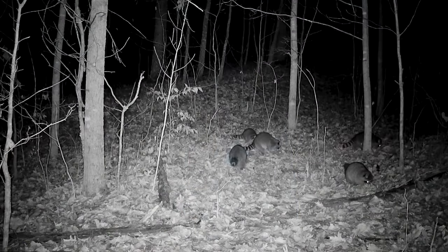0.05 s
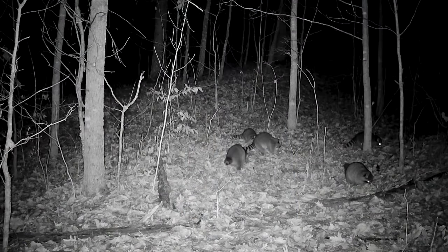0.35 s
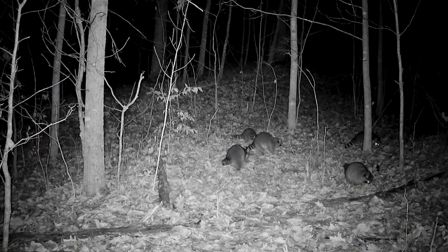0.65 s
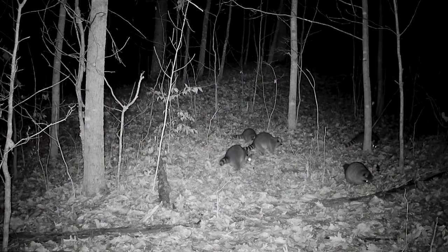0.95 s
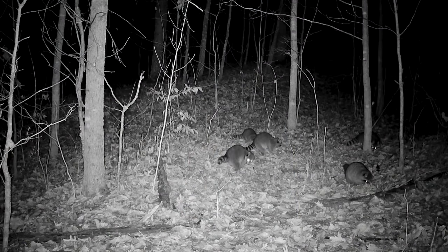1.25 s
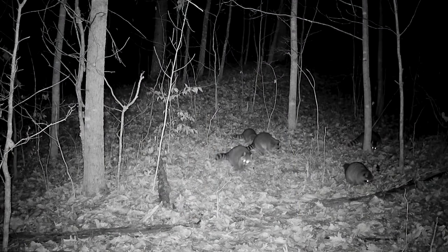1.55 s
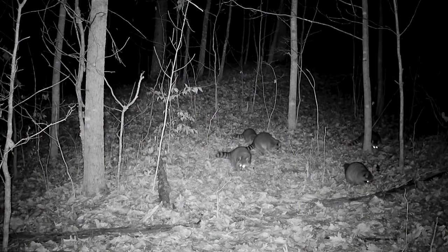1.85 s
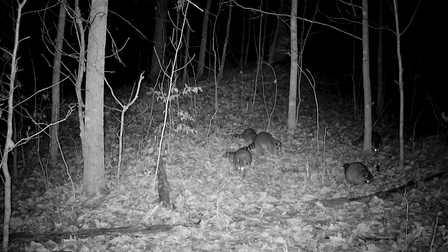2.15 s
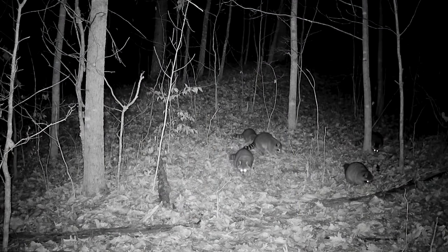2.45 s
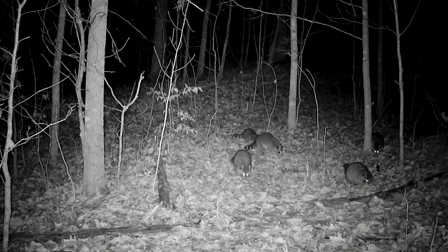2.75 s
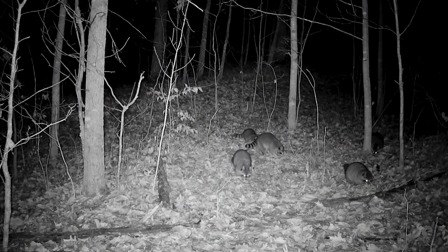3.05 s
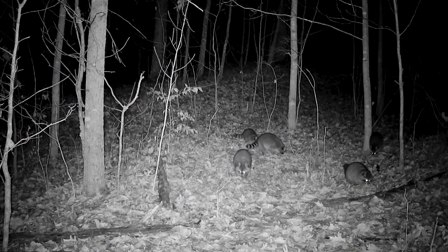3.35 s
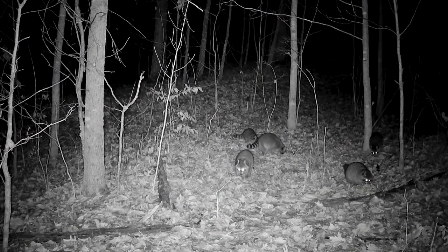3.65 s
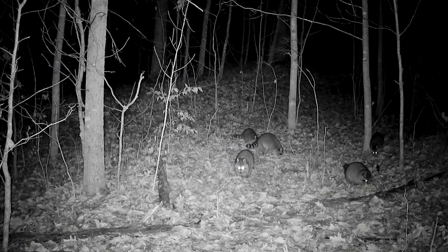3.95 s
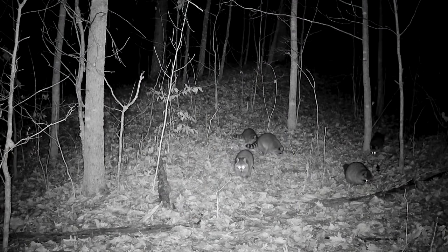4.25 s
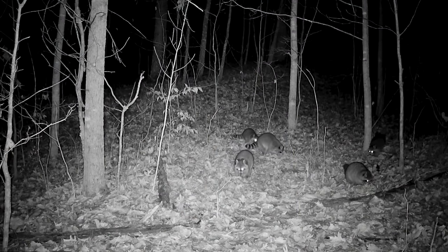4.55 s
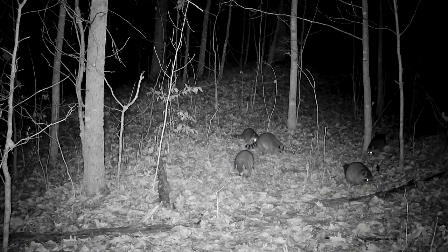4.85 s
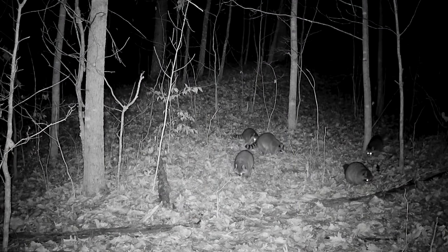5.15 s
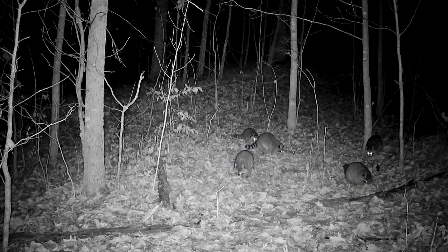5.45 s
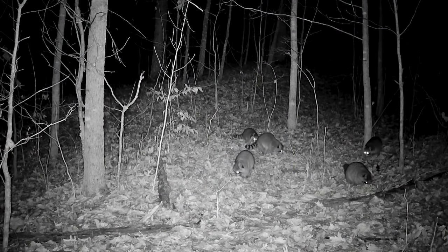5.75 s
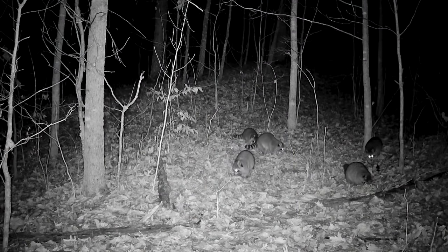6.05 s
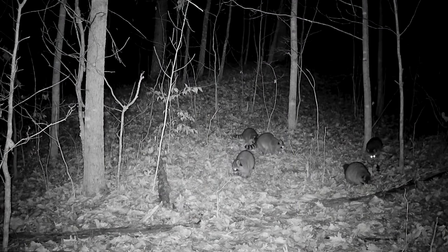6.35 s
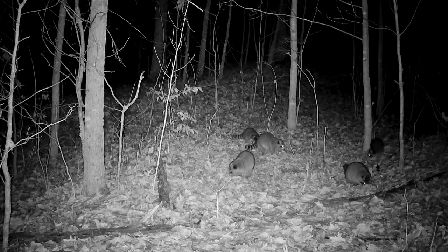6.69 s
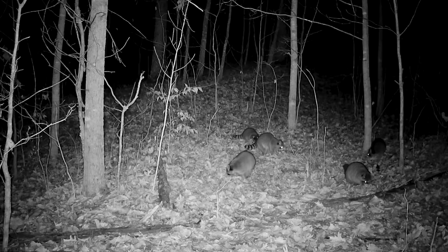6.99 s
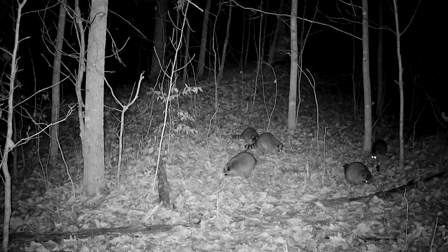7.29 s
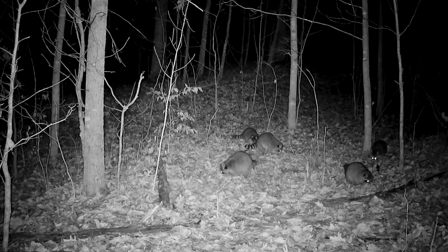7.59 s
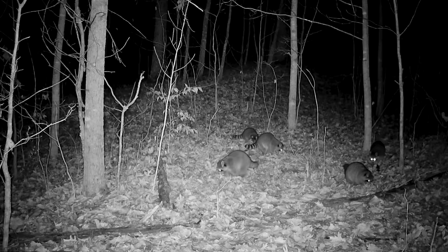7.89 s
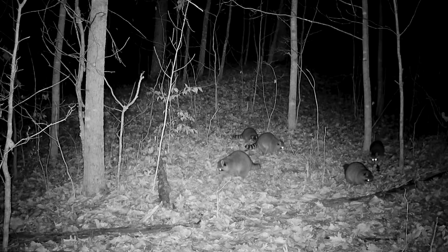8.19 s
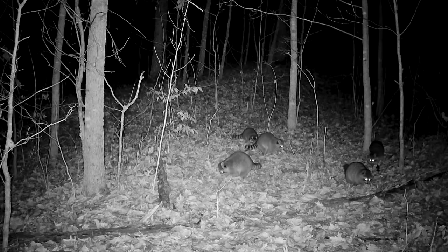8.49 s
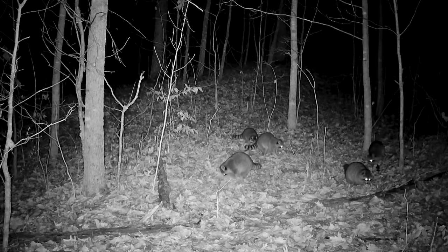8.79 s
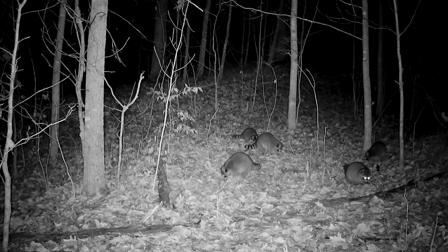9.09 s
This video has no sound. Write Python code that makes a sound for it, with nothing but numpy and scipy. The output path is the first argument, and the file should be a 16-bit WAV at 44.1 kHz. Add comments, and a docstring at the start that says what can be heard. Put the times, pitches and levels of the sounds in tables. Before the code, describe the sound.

A field cricket chirps close by over trilling tree crickets, ticking katydids and a distant frog in a wood at night.

```python
"""A wood at night, two spaced microphones. Throughout: far machine hum, a chorus of trilling and throbbing
tree crickets, katydids shuffling on the left, a field cricket chirping close by. All these insects
draw a scraper over a wing file. Farther field crickets answer: right from 0.2 s, left from 2.2 s.
From 0.8 to 4.3 s a far frog pulses its throat in four double croaks. From 2.8 s a katydid ticks on the
right. On the left another scrapes at 5.2 and 8.2 s and zips four times between 7.5 and 9 s."""
import sys
import numpy as np
from scipy import signal
from scipy.fft import rfft, irfft, next_fast_len
from scipy.io import wavfile

SR = 44100
rng = np.random.default_rng(int(sys.argv[2]) if len(sys.argv) > 2 else 0)


def store_wav(level_fs):
    """Save 16-bit WAV to argv[1]."""
    pcm = np.round(np.clip(np.atleast_2d(level_fs), -1, 1) * 32767)
    wavfile.write(sys.argv[1], SR, pcm.T.astype(np.int16))


N = 406954
TIME = np.arange(N) / SR

# Rumble and hiss before the swell. Each row: frequency in Hz, left and right density in dB per Hz.
AIR_SPECTRUM = [(25, -94, -115), (42, -78, -99), (62.8, -79, -64), (90.5, -65, -63), (103, -67, -62),
                (138.5, -71, -64), (145.7, -73, -73.5), (238, -80.5, -78.5), (329, -83, -84),
                (430, -85.5, -90.5), (1030, -93, -98), (1670, -97, -99), (2820, -99, -100.5),
                (4550, -104, -105), (6000, -102, -103), (8750, -102, -103), (14700, -100, -100.5)]
# Swell of rumble and hum. Each row: time in seconds, gain in dB.
RUMBLE_SWELL = [(0.0, -1.7), (0.25, 2.3), (0.6, -2.1), (2.3, -1.5), (4.6, 0.1), (5.05, 1.7), (5.85, -0.3),
                (7.1, 2.0), (8.1, -0.7), (8.75, -0.9), (9.2, 2.5)]
# Far machine. Each row: frequency in Hz, level before the swell in dB, left minus right in dB.
HUM_TONES = [(88.3, -54, 13.5), (122.3, -53.5, -10), (138.5, -61.5, -3.5), (151.1, -68.5, -10)]
# Farthest crickets. Each row: centre in Hz, resonance width in Hz, mean level in dB.
CHORUS_BANDS = [(2270, 480, -66), (3253, 400, -68), (4117, 400, -62.8)]
# Frog notes. Each row: start in seconds, relative level in dB.
FROG_NOTES = [(.795, -5.5), (0.891, 0), (1.74, -5.5), (1.846, 0), (3.069, -2), (3.171, 0.5), (4.110, -4),
              (4.214, 1.5)]
# Wing resonances, left katydids. Each row: centre in Hz, width in Hz, gain in dB.
WING_MODES = [(9390, 210, 1.5), (9850, 140, 1), (10500, 230, -1.5), (10960, 62, 6), (11200, 81, -2),
              (12030, 330, -1.5), (14240, 530, 2), (14300, 280, -7), (16200, 1400, -1)]
# Colour of the shuffle and of the ticks. Each row: frequency in Hz, gain in dB.
SHUFFLE_SPECTRUM = [(4000, -43), (7000, -19), (9400, -16), (10300, -6.5), (11300, -2), (12500, 2),
                    (13300, 5), (14600, -5.5), (15500, 3.5), (16500, 3)]
TICK_SPECTRUM = [(2000, -36), (6000, -20.5), (8300, -13), (9600, -8), (11000, -3.5), (13200, 5), (15300, 3),
                 (16500, -9)]
# Phrases, right katydid. Each row: time of the last opening tick in seconds, relative level in dB.
TICK_PHRASES = [(2.863, -2.5), (3.129, -.5), (3.393, 0), (3.641, 0.5), (3.890, -0.5), (4.149, -1),
                (4.480, -14), (4.730, -14), (4.983, -13), (5.395, 0), (7.309, -12), (7.704, -13)]
# Ticks that open a phrase. Each row: offset from the last one in seconds, relative level in dB.
OPENING_TICKS = [(-.086, -4.5), (-.019, -2.5), (0, 0)]
# Zips and lower scrapes, left katydid.
# Each row: start in seconds, length in seconds, relative level in dB, centre in Hz, width in Hz.
ZIP_SWEEPS = [(7.491, .027, -47, 8900, 1500), (7.788, .033, -37.5, 11100, 5000),
              (8.612, .022, -46, 9100, 1600), (8.879, 0.063, -30, 11500, 3180)]
SCRAPE_SWEEPS = [(5.203, .046, -57, 5150, 400), (8.16, .048, -57, 5300, 500)]
# Field cricket bouts. Each row: first chirp in seconds, last chirp in seconds, relative level in dB.
FAR_LEFT_BOUTS = [(2.2, 3.44, 0), (4.571, 4.571, -1), (5.212, 9.11, 0)]
FAR_RIGHT_BOUTS = [(.2, 3.42, -0.15), (.582, .582, -0.9), (4.111, 7.913, 0), (8.53, 8.3, 1)]
NEAR_BOUTS = [(-.058, .335, 1), (.918, .918, 2), (1.362, 2.412, 0.5), (2.789, 3.147, .5),
              (3.562, 6.208, .5), (6.603, 6.603, .3), (6.947, 8.781, -.6), (9.171, 9.171, 1)]
# Near chirp: a soft lead-in, four full strokes. Each row: offset from the first full stroke in seconds,
# length in seconds, top pitch in Hz, relative level in dB.
CHIRP_STROKES = [(-.032, .026, 4070, -10), (0, .024, 4255, -1.2), (.043, .031, 4305, 0),
                 (.089, .032, 4315, -.2), (.138, .031, 4320, 0)]


def undb(db):
    """Decibels to gain."""
    return 10 ** (np.asarray(db) / 20)


def unit(x):
    """Scale to rms 1."""
    return x / np.sqrt(np.mean(x ** 2) + 1e-20)


def place(x, pan_db):
    """Pan; pan_db is left minus right."""
    return x * undb(np.array([[pan_db], [-pan_db]]) / 2)


def add(out, start_s, x):
    """Mix x into out from start_s."""
    i = int(round(start_s * SR))
    a, b = max(i, 0), min(i + x.shape[-1], N)
    if b > a:
        out[..., a:b] += x[..., a - i:b - i]


def walk(rate_hz):
    """Random wander, spread near 1."""
    knots = rng.standard_normal(2048)
    return 1.2 * np.interp(TIME * rate_hz, np.arange(len(knots)), knots)


def colour(x, hz, db):
    """Filter by a spectrum of (Hz, dB) points."""
    size = next_fast_len(N + 4096)
    bin_hz = np.maximum(np.arange(size // 2 + 1) * SR / size, 1)
    gain = undb(np.interp(np.log(bin_hz), np.log(hz), db))
    return irfft(rfft(x, size) * gain, size)[..., :N]


def ring(x, hz, width_hz):
    """One resonance, gain 1 at its centre."""
    return signal.lfilter(*signal.iirpeak(min(hz, .45 * SR), hz / width_hz, fs=SR), x)


def woods(x, wet_db, t60_s, order=3):
    """Direct sound plus echoes per microphone: sparse off trunks (order 3), dense off leaves (1)."""
    t = TIME[:SR // 2]
    echoes = rng.standard_normal((2, len(t))) ** order * undb(-60 * t / t60_s) * (t > .003)
    echoes *= undb(wet_db) / np.sqrt(np.sum(echoes ** 2, axis=1, keepdims=True))
    x = np.atleast_2d(x)
    return x + signal.fftconvolve(x, echoes, axes=-1)[:, :N]


def air():
    """A far machine's wavering hum in low rumble, under faint even hiss."""
    hz, left_db, right_db = np.transpose(AIR_SPECTRUM)
    noise = np.array([colour(rng.standard_normal(N), hz, db) for db in (left_db, right_db)])
    noise *= np.sqrt(SR / 2)
    rumble = signal.sosfiltfilt(signal.butter(2, 200, fs=SR, output="sos"), noise)
    hiss = noise - rumble
    hum = 0
    for tone_hz, db, pan_db in HUM_TONES:
        sides = []
        for _ in range(2):
            phase = 2 * np.pi * np.cumsum(tone_hz + 1.113 * walk(5)) / SR
            sides.append(np.sin(phase) * undb(db + 2 * walk(3.6)))
        hum += place(np.array(sides), pan_db)
    swell_db = np.interp(TIME, *np.transpose(RUMBLE_SWELL)) - .7
    return hiss + (rumble + hum) * undb(swell_db)


def far_chorus():
    """The farthest crickets merge into a soft band at each kind's pitch."""
    out = 0
    for hz, width_hz, db in CHORUS_BANDS:
        noise = rng.standard_normal((2, N))
        band = ring(ring(noise, hz, width_hz), hz, width_hz)
        out += unit(band) * undb(db + walk(9.1))
    return out


def trill(hz, rate_hz, wander=.00289, sag=.086):
    """One tree cricket: an unbroken train of pure strokes, each sagging in pitch."""
    cycle = (np.cumsum(rate_hz * (1 + .001 * walk(2))) / SR + rng.random()) % 1
    pitch_hz = hz * (1 + wander * walk(25) - sag * (cycle - .5))
    return unit(np.sin(np.pi * cycle) ** 4 * np.sin(2 * np.pi * np.cumsum(pitch_hz) / SR))


def chorus(hz, spread_hz, rate_hz, count=4):
    """Distant trills on neighbouring pitches, blurred by the trees."""
    voices = 0
    for k in np.linspace(-1, 1, count):
        voice = trill(hz + spread_hz * k, rate_hz * rng.uniform(.85, 1.15), wander=.011, sag=.045)
        voices += voice * (1 - .15 * k * k)
    return unit(woods(voices, wet_db=13, t60_s=.35, order=1))


def tree_crickets():
    """By rising pitch: groups that swell in step, drone, throb and hold steady; a soloist, right."""
    crest_s, period_s, half_width_s = .603, .678, .21
    from_crest_s = (TIME - crest_s + period_s / 2) % period_s - period_s / 2
    swell = np.exp(-(from_crest_s / half_width_s) ** 4)
    throb_crest_s, throb_period_s = .59, .66
    throb_db = 2.4 * np.cos(2 * np.pi * (TIME - throb_crest_s) / throb_period_s) + 1.6 * walk(5)
    rising_db = -60.6 + .33 * TIME
    swelling = chorus(2140, spread_hz=45, rate_hz=41) * swell * undb(rising_db)
    droning = chorus(2265, spread_hz=45, rate_hz=46) * undb(rising_db)
    throbbing = chorus(2380, spread_hz=50, rate_hz=44) * undb(-62.3 + throb_db)
    steady = chorus(3160, spread_hz=140, rate_hz=50, count=5) * undb(-65)
    soloist = woods(place(trill(3290, rate_hz=42.8), -14), wet_db=-16, t60_s=.3) * undb(-70)
    groups = place(swelling, 2.3) + place(droning, .46) + place(throbbing, .2) + place(steady, 1.3)
    return groups + soloist


def frog(pulse_period_s=.0132):
    """Each note: four throat pulses in two resonances, the middle pulses strongest."""
    out, t = np.zeros(N), TIME[:SR // 40]
    resonances = np.sin(2 * np.pi * 1530 * t) + .65 * np.sin(2 * np.pi * 3130 * t)
    pulse = t / .0017 * np.exp(-t / .0014) * resonances
    for start_s, db in FROG_NOTES:
        for k, pulse_db in enumerate([-.5, 4.5, 5, 1.5]):
            jitter_s = .0004 * rng.standard_normal()
            add(out, start_s + k * pulse_period_s + jitter_s, undb(db + pulse_db) * pulse)
    croaks = woods(out, wet_db=-7, t60_s=.12, order=1)
    return place(croaks * undb(-41.2), -6)


def wing_ring(strikes):
    """Tooth strikes ring a katydid's wing modes."""
    return sum(undb(db) * ring(strikes, hz, width_hz) for hz, width_hz, db in WING_MODES)


def tooth_strikes(rate_hz):
    """One impulse per file tooth passed."""
    return np.diff(np.floor(np.cumsum(rate_hz) / SR), prepend=0)


def shuffle(wing_hz, tooth_hz):
    """Wings open and close; both sweeps drag the scraper over single teeth."""
    cycle = (np.cumsum(wing_hz * (1 + .003 * walk(2.7))) / SR + rng.random()) % 1
    opening, closing = (np.exp(-((cycle - centre) / .16) ** 4) for centre in (.25, .66))
    teeth = tooth_strikes(tooth_hz * np.exp(.2 * walk(200)))
    return unit(teeth * (opening + undb(-1.5) * closing) * undb(3.2 * rng.standard_normal(N)))


def shuffling_katydids():
    """Two steady singers, left, at slightly different wing rates."""
    strikes = shuffle(wing_hz=16.6, tooth_hz=530) + undb(-3) * shuffle(wing_hz=18.1, tooth_hz=600)
    wings = colour(.89 * strikes + wing_ring(strikes), *np.transpose(SHUFFLE_SPECTRUM))
    song = woods(wings, wet_db=-7.5, t60_s=.08, order=1)
    return place(unit(song) * undb(-60.5), 33.2)


def file_sweep(length_s, db, hz, width_hz):
    """One sweep of the file: tooth strikes swell and fade, each ringing the wing with a dull thud."""
    u = np.linspace(0, 1, int(length_s * SR))
    wander = np.interp(u, np.linspace(0, 1, 20), rng.standard_normal(20))
    teeth = tooth_strikes(420 * np.exp(.31 * wander)) * np.sin(np.pi * u) ** 2
    teeth = np.pad(teeth, (0, SR // 100))
    wing = ring(.5 * teeth + wing_ring(teeth), hz, width_hz)
    thud = ring(teeth, 1600, 2700)
    return undb(db) * (unit(wing) + undb(-22.5) * unit(thud))


def zipping_katydid(lead_s=.06):
    """Left: wings open faintly, then close with a zip; twice they only scrape."""
    out = np.zeros(N)
    for start_s, *sweep in ZIP_SWEEPS:
        add(out, start_s - lead_s, file_sweep(length_s=.04, db=-61, hz=8600, width_hz=2500))
        add(out, start_s, file_sweep(*sweep))
    for start_s, *sweep in SCRAPE_SWEEPS:
        add(out, start_s, file_sweep(*sweep))
    song = woods(out, wet_db=-16, t60_s=.08, order=1)
    return place(song * undb(-13.5), 23)


def ticking_katydid(run_delay_s=.009, run_s=.114, ticks_per_s=180):
    """Close right: each phrase is three separate ticks, then an uneven, quickening run."""
    clicks, impulse = np.zeros(N), np.ones(1)
    for phrase_s, db in TICK_PHRASES:
        for offset_s, tick_db in OPENING_TICKS:
            add(clicks, phrase_s + offset_s, undb(db + tick_db) * impulse)
        for u in np.linspace(0, 1, int(run_s * ticks_per_s)):
            offset_s = run_delay_s + run_s * (u + .15 * u * (1 - u)) + .001 * rng.standard_normal()
            tick_db = -9.8 + 2.2 * rng.standard_normal() - 3.2 * (u - .6) ** 2
            add(clicks, phrase_s + offset_s, undb(db + tick_db) * impulse)
    ticks = colour(clicks, *np.transpose(TICK_SPECTRUM))
    song = woods(ticks, wet_db=-8.5, t60_s=.07, order=1)
    return place(song * undb(-19), -21)


def chirps(bouts, period_s):
    """Time and level of each chirp; bouts are filled evenly at about period_s."""
    return [(chirp_s, db) for first_s, last_s, db in bouts
            for chirp_s in np.linspace(first_s, last_s, round((last_s - first_s) / period_s) + 1)]


def stroke(length_s, hz, rise_hz, fall_hz, crest, left_lead_rad=0, rough=.11, flutter_hz=45):
    """One wing closure: the scraper speeds up until the crest, then slows, so the pitch arches."""
    u = np.linspace(-1, 1, int(length_s * SR))
    flutter, grip = (np.interp(u, np.linspace(-1, 1, 12), rng.standard_normal(12)) for _ in range(2))
    arch_hz = np.where(u < crest, rise_hz, fall_hz) * np.abs((u - crest) / (1 - crest)) ** 1.84
    pitch_hz = hz + 15 * rng.standard_normal() - arch_hz + flutter_hz * flutter
    phase = 2 * np.pi * (np.cumsum(pitch_hz) / SR + rng.random())
    pressure = (1 - u ** 2) ** .85 * (1 + .12 * u)  # slow build, quicker release
    return pressure * (1 + rough * grip) * np.sin(phase + np.array([[left_lead_rad], [0]]))


def far_cricket(bouts, period_s, hz, level_db, pan_db):
    """A field cricket to one side: slower chirps of three falling strokes."""
    length_s, stroke_period_s = .03, .054
    out = np.zeros(N)
    for chirp_s, db in chirps(bouts, period_s):
        for k in range(3):
            call = stroke(length_s, hz, rise_hz=90, fall_hz=260, crest=-.6)[0]
            add(out, chirp_s + k * stroke_period_s - length_s / 2, undb(level_db + db) * call)
    return woods(place(out, pan_db), wet_db=-7.5, t60_s=.3)


def near_cricket():
    """A chirp's strokes rise in pitch and strength; the right microphone lags slightly."""
    out = np.zeros((2, N))
    for chirp_s, db in chirps(NEAR_BOUTS, period_s=.37):
        for offset_s, length_s, hz, stroke_db in CHIRP_STROKES:
            call = stroke(length_s * rng.uniform(.85, 1.15), hz, rise_hz=170, fall_hz=240, crest=.05,
                          left_lead_rad=1.75, rough=.3, flutter_hz=55)
            add(out, chirp_s + offset_s - length_s / 2, undb(db + stroke_db) * call)
    return woods(place(out * undb(-39), 2.3), wet_db=-9, t60_s=.32)


def scene():
    """All singers over the night air."""
    field_crickets = near_cricket()
    field_crickets += far_cricket(FAR_LEFT_BOUTS, period_s=.6, hz=4420, level_db=-58, pan_db=16.5)
    field_crickets += far_cricket(FAR_RIGHT_BOUTS, period_s=.5, hz=4205, level_db=-56.5, pan_db=-12)
    katydids = shuffling_katydids() + ticking_katydid() + zipping_katydid()
    return field_crickets + tree_crickets() + far_chorus() + katydids + frog() + air()


def record(dry):
    """Steep low-pass at 15.8 kHz."""
    return signal.sosfilt(signal.ellip(10, .2, 70, 15800, fs=SR, output="sos"), dry)


dry = scene()
out = record(dry)
store_wav(out)
```